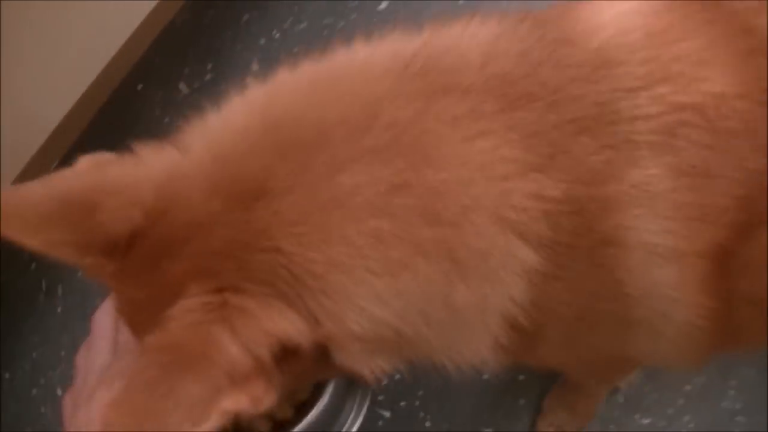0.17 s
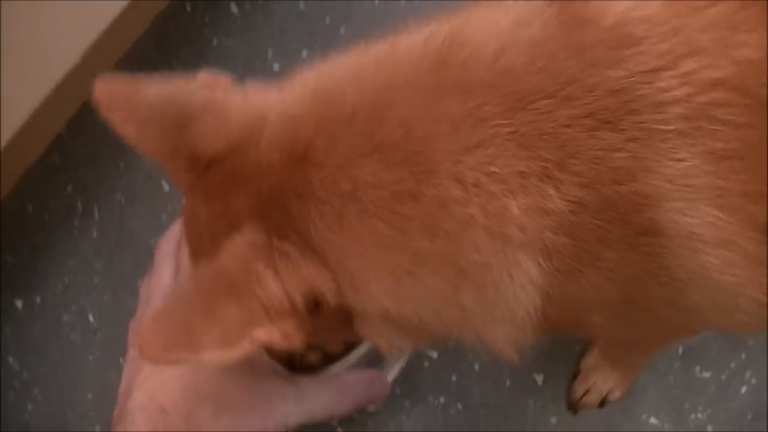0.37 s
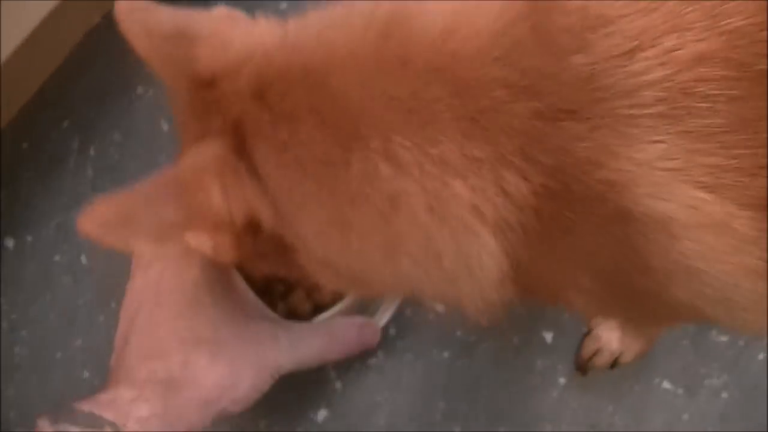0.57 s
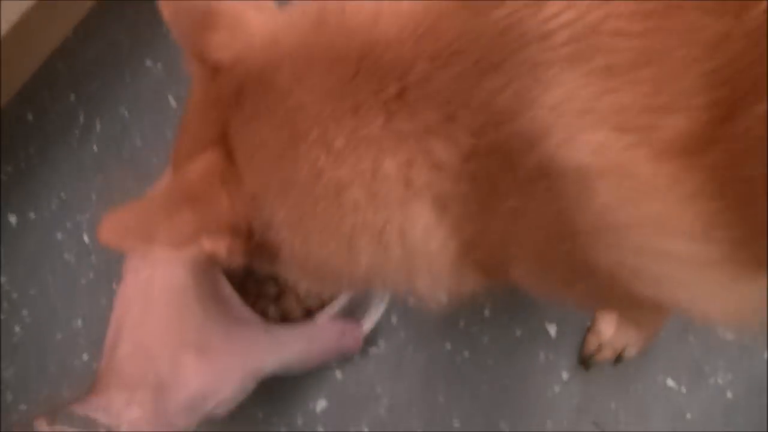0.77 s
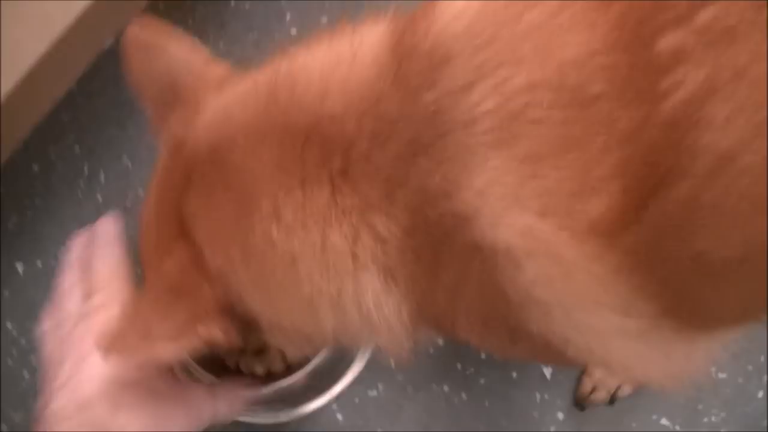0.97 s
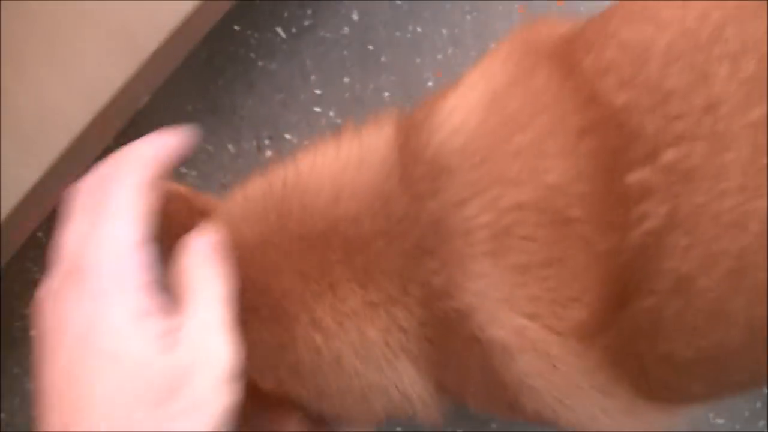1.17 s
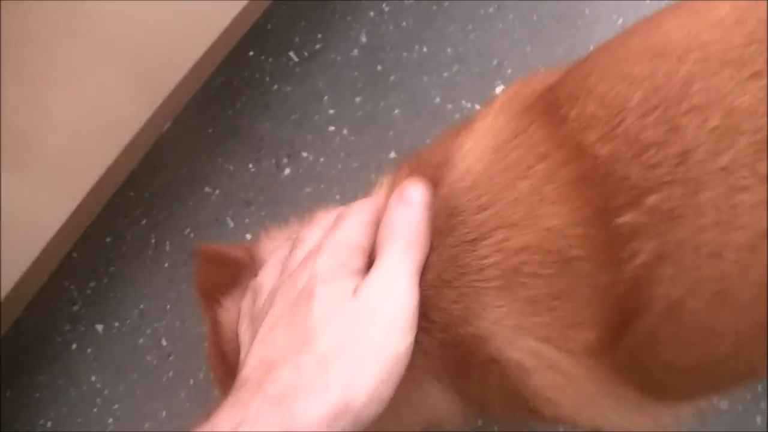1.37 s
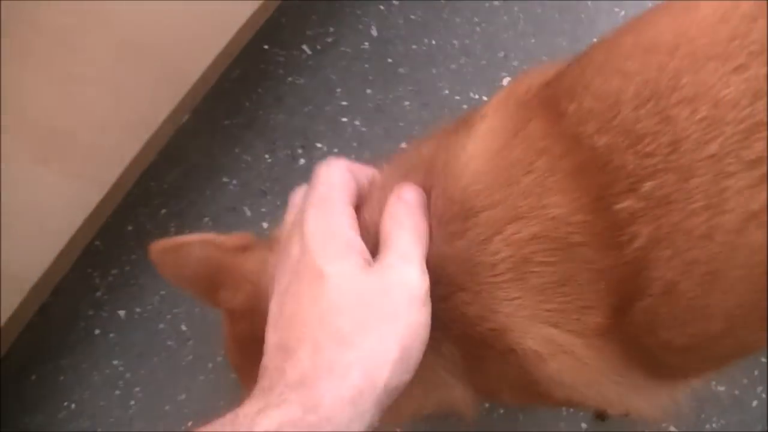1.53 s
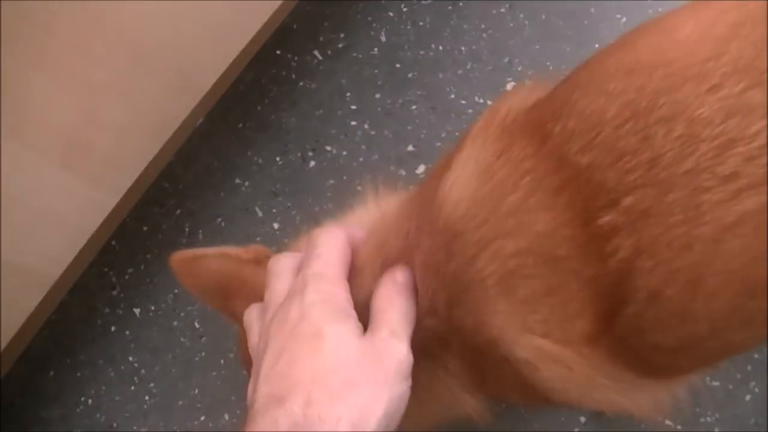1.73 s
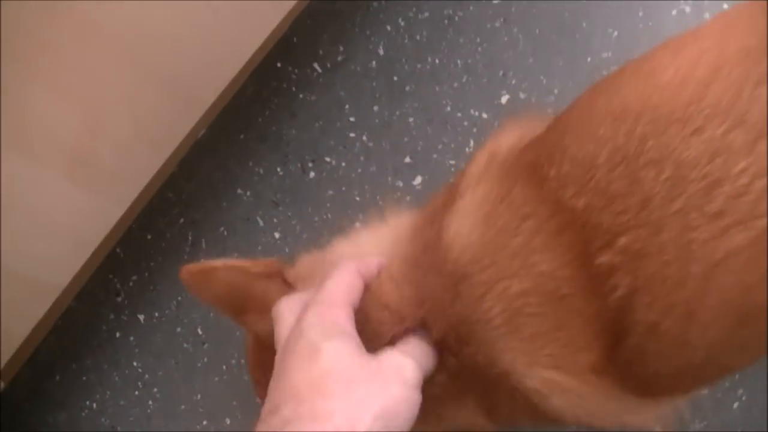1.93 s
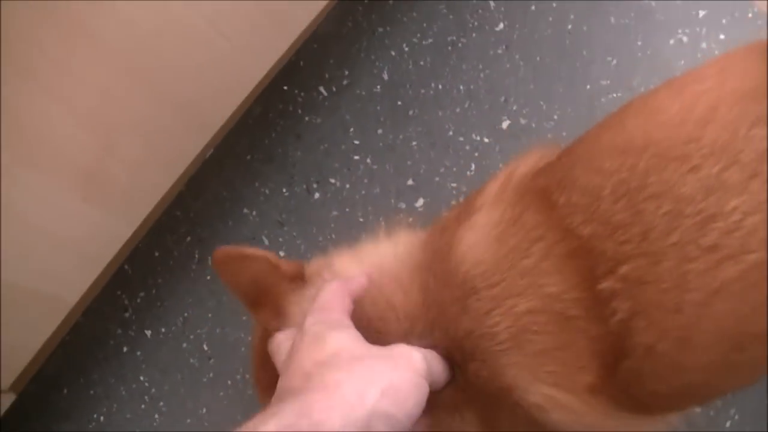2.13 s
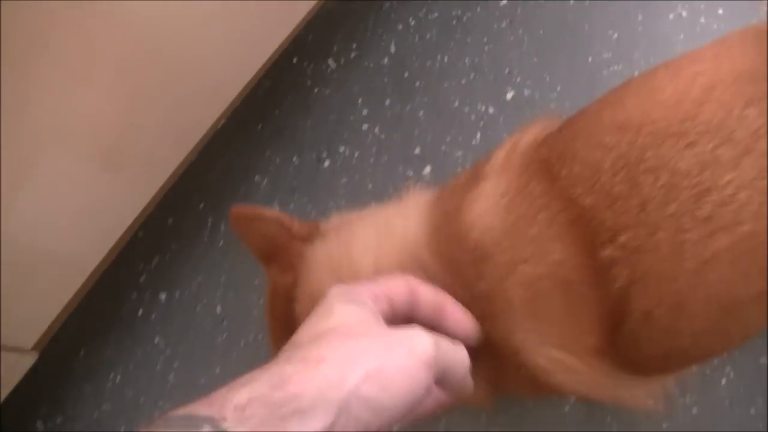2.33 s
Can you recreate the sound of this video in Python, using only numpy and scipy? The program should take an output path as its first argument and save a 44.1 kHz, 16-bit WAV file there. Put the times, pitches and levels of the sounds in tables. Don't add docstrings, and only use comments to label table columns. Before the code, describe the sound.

Dry kibble clatters in a steel bowl as a dog noses through it, close and crisp. From 0.1 to 0.8 s quick, bright rattles crowd together in the hand-held bowl. At about 0.82 and 0.87 s it lands with loud hard clunks, rocking dully near 0.94. After a brief lull, sharp clinks return around 1.3-1.4 and 1.65 s, then thin to light ticks by 2.4 s over faint kitchen hiss and low hum.

```python
import sys
import numpy as np
from scipy import signal
from scipy.fft import rfft, irfft, next_fast_len
from scipy.io import wavfile

SR = 44100
rng = np.random.default_rng(int(sys.argv[2]) if len(sys.argv) > 2 else 0)


def unload_audio(sound):
    columns = np.transpose(np.atleast_2d(sound))
    steps = np.round(np.clip(columns, -1, 1) * 32767)
    wavfile.write(sys.argv[1], SR, steps.astype(np.int16))


def field_ratio(decibels):
    return 10 ** (np.asarray(decibels, dtype=float) / 20)


N = 105840

# frequency_hz, level_db
AIR_SPECTRUM = [(24, -14), (40, -14.5), (245, -4.5), (316, -6.5), (485, -7.5), (823, -5), (10800, -19.5),
                (15300, -26.5), (16500, -28)]
# time_s, gain_db
HUM_WAVER = [(0, 13.5), (.9, -6), (1.8, 12)]
AIR_DB, HUM_HZ, HUM_DB = -53, 65, -75.5

# frequency_hz, bandwidth_hz, level_db
HELD_MODES = [(1110, 60, 2), (1420, 80, -2), (1700, 200, 0), (2080, 90, -2), (2910, 90, 0), (3480, 60, -6),
              (4210, 130, -7), (5210, 80, -7), (6670, 90, -14), (7990, 140, -14)]
# frequency_hz, bandwidth_hz, level_db
FLOOR_MODES = [(474, 55, -6), (655, 50, -6), (960, 60, -7), (1230, 70, 2), (1670, 90, -4), (2140, 55, -1),
               (2540, 50, -2), (2890, 120, -4), (3600, 70, -6), (4130, 110, -5), (5260, 140, -9),
               (6450, 120, -15), (8170, 250, -16)]
# frequency_hz, level_db
HELD_CRACK = [(240, -101), (400, -86), (609, -14), (1080, -1), (2840, 0.5), (5220, -12.5), (6290, -15),
              (15000, -24.5), (16500, -77)]
# frequency_hz, level_db
FLOOR_CRACK = [(88, -47), (150, -11), (469, 0), (830, -7), (934, -6.5), (2810, 3.5), (4600, -4.5),
               (15000, -25.5), (16500, -37)]
# frequency_hz, t60_s
CRACK_DECAY = [(500, 0.097), (3000, 0.11), (12000, 0.067)]
HELD_CUT_HZ, FLOOR_CUT_HZ = 680, 310
MODE_SPREAD_DB, MODE_SPLIT, MODE_RISE_S = 4.5, 0.01, 0.00022
CRACK_DB, TICK_DB, TICK_S = -3, 5.5, 0.0025
SOFT_DB, SPOT_BAND_DB = -0.23, 5

# start_s, length_s, level_db, tilt_db_per_octave
SHOVES = [(0.091, 0.14, -46, 1.5), (0.174, 0.13, -43, 2), (0.279, 0.12, -44.5, 1), (0.359, 0.11, -34, 1),
          (0.44, 0.17, -46.5, -0.5), (0.516, 0.4, -45.5, -0.5), (0.614, 0.083, -29.5, 2),
          (0.685, 0.19, -41.5, 0), (0.84, 0.032, -35.5, -3), (0.874, 0.065, -31, -3),
          (0.922, 0.11, -36.5, 4), (1.008, 0.23, -49, -3), (1.179, 0.06, -46, -2.8),
          (1.235, 0.15, -46, -1.9), (1.315, 0.094, -41.5, 4.5), (1.388, 0.11, -40.5, -2.4),
          (1.47, 0.26, -42.5, -1.3), (1.648, 0.1, -36.5, 0.4), (1.752, 0.13, -38, 1.6),
          (1.848, 0.099, -52.5, 5), (1.918, 0.073, -43, -0.8), (1.983, 0.13, -42, -1), (2.06, 0.17, -49, 0),
          (2.305, 0.11, -50.5, 0), (2.354, 0.33, -51, -3.5)]
# start_s, peak_db, contact_hz, tilt_db_per_octave
HELD_KNOCKS = [(0.114, -23.5, 1900, -0.61), (0.143, -23, 1920, -0.47), (0.19, -30.5, 1820, 5),
               (0.22, -20, 2020, 3), (0.2831, -16, 2080, 0), (0.306, -22.5, 2020, -2),
               (0.399, -23, 1620, -5), (0.411, -19, 1520, 4), (0.497, -24.5, 1920, 1),
               (0.514, -22, 1140, -1.1), (0.54, -15.5, 2140, -1), (0.55, -22, 1900, -0.5),
               (0.561, -28, 2800, 1), (0.585, -24, 2100, 1), (0.622, -13, 2340, 0.5),
               (0.647, -14.5, 1170, 5), (0.684, -19, 1420, 2), (0.701, -21.5, 1320, 1),
               (0.78, -16.5, 1300, -1), (0.8, -22, 1130, -2.5)]
# start_s, peak_db, contact_hz, tilt_db_per_octave, clatter_s
FLOOR_KNOCKS = [(0.8243, -11.5, 796, -3.5, 0.017), (0.8725, -8, 740, -7, 0.0031),
                (0.938, -27, 420, 0.5, 0.016), (0.955, -23, 630, -5, 0.022), (1.187, -27, 1590, 0, 0.012),
                (1.27, -25.5, 1290, -1, 0.0091), (1.325, -12, 1090, 1.9, 0.018),
                (1.395, -14.5, 1810, -2, 0.0059), (1.433, -20, 2600, 6, 0.0094),
                (1.578, -26.5, 1240, 0.5, 0.0047), (1.643, -20.5, 1400, 2.2, 0.025),
                (1.806, -23.5, 1240, -3, 0.0068), (1.9235, -20, 2820, 0, 0.015),
                (1.9975, -30.5, 2400, -7, 0.0037), (2.072, -22.5, 1350, -1, 0.027),
                (2.107, -21.5, 1370, 1.5, 0.012), (2.158, -28.5, 3580, -0.5, 0.011),
                (2.288, -32.5, 2130, -3, 0.0083), (2.311, -22, 1000, 1.2, 0.0097),
                (2.375, -27.5, 2900, 5, 0.0062)]
# start_s, peak_db, contact_hz, tilt_db_per_octave, clatter_s
SNAPS = [
    (.339, -21.5, 8100, 8, 0.0092),
    (.7225, -24, 8000, 10, 0.02),
    (.8243, -9, 5830, 16, 0.0093),
    (.838, -14, 5370, 22, 0.0093),
    (.8735, -16, 7100, 15, 0.022),
    (1.1553, -16.5, 3840, 6.5, 0.00034),
    (.935, -18, 322, -2.5, 0.032),
]
# start_s, peak_db, contact_hz, tilt_db_per_octave
TICKS = [(0.098, -38, 1880, 5), (0.208, -22, 2600, -4.5), (0.375, -34, 1700, -2), (0.386, -27, 1630, 0),
         (0.61, -20, 1670, -2), (.632, -17.5, 2930, -2), (.66, -45, 1700, -7), (.72, -21.5, 1780, 1),
         (0.731, -35, 3500, -1), (.751, -26, 4340, 2), (.889, -16, 3100, 6.5), (1.244, -36, 1530, 4),
         (1.265, -31, 1230, -11), (1.289, -26, 5070, 5.5), (1.296, -21.5, 2860, -2), (1.304, -25, 2000, -1),
         (1.344, -35, 2930, 0), (1.403, -22, 1740, -4.5), (1.413, -30, 1890, -11), (1.422, -31, 1660, -6),
         (1.441, -23.5, 2190, 2), (1.506, -31.5, 1700, -1), (1.661, -23, 1200, 0), (1.672, -23, 2320, -3),
         (1.682, -17.5, 2920, -0.5), (1.694, -23, 2730, 0), (1.707, -24, 2910, 3), (1.767, -26, 1200, -1.5),
         (1.779, -27.5, 4070, -5.5), (1.789, -26, 3900, 0.5), (1.824, -25.5, 1190, -5.5),
         (1.843, -26, 1630, -4.5), (1.864, -38, 3530, -3), (2.016, -26.5, 1250, 1), (2.038, -29.5, 2570, 5),
         (2.047, -26.5, 1180, 1.5), (2.054, -28, 2800, -6), (2.123, -34.5, 1360, -1),
         (2.135, -34, 4100, -7), (2.184, -40.5, 1260, -2), (2.359, -29.5, 4230, -1.5),
         (2.393, -23, 3900, -1)]
SET_DOWN_S, SHOVE_LEAN = 0.81, 0.54
HELD_CLATTER_S, TICK_CLATTER_S, SWELL_S = 0.007, 0.0068, 0.0006
DAMP = 14.7
CLICKS_PER_S, CLICK_SPREAD_DB, RAREST = 1000, 1, 0.12
BLOW_DB, CONTACT_DB, CONTACT_OCTAVES = 10.5, 7.5, 0.45

# frequency_hz, level_db
SIDE_SPECTRUM = [(300, -4.5), (1000, -34), (2500, -18.5), (5000, -3.5), (12000, 2)]
LEAD_SAMPLES = 0.33
# frequency_hz, t60_s
ROOM_DECAY = [(200, 0.25), (1500, 0.19), (6000, 0.36), (15000, 0.36)]
ROOM_DB = -9.5

# start_s, frequency_hz, level_db, t60_s
RIM_RINGS = [
    (.8243, 900, -13.5, 0.031),
    (0.827, 5300, -25, 0.032),
    (0.828, 10600, -20, 0.042),
    (0.836, 5380, -25, 0.084),
    (.873, 786, -26, 0.049),
    (.876, 6200, -32, 0.19),
    (0.938, 398, -23, 0.091),
    (.946, 471, -22.5, 0.055),
    (.954, 640, -22, 0.058),
    (0.964, 4080, -34.5, 0.14),
]
RIM_RISE_S, EDGE_HZ = 0.00057, 16100


def evened(x):
    return x / np.sqrt(np.mean(x ** 2) + 1e-20)


def read(points, hz):
    f, value = np.transpose(points)
    return np.interp(np.log(hz + 1), np.log(f + 1), value)


def add(mix, start_s, sound):
    part = mix[round(start_s * SR):][:len(sound)]
    part += sound[:len(part)]


def coloured(x, db_of):
    length = x.shape[-1]
    size = next_fast_len(length + 2048) * 2
    cepstrum = irfft(db_of(np.fft.rfftfreq(size, 1 / SR)) * np.log(10) / 20, size)
    cepstrum[1:size // 2] *= 2
    response = np.exp(rfft(cepstrum[:size // 2], size))
    return irfft(rfft(x, size) * response, size)[..., :length]


def fading(x, decay):
    hz, t, z = signal.stft(x, SR, nperseg=64)
    z = z * field_ratio(-60 * t / read(decay, hz)[:, None])
    return signal.istft(z, SR, nperseg=64)[1][..., :x.shape[-1]]


def kitchen():
    shared, left, right = rng.standard_normal((3, N))
    noise = np.array([shared + 0.6 * left, shared + 0.6 * right])
    air = evened(coloured(noise, lambda f: read(AIR_SPECTRUM, f)))
    t = np.arange(N) / SR
    hum_level = field_ratio(HUM_DB + np.interp(t, *np.transpose(HUM_WAVER)))
    return field_ratio(AIR_DB) * air + hum_level * np.sin(2 * np.pi * HUM_HZ * t)


def bowl(modes, crack, cut_hz, count=8):
    hz, width, db = np.transpose(modes)[:, :, None, None]
    t = np.arange(4000) / SR
    strength, detune, phase = rng.standard_normal((3, len(modes), 2 * count, 1))
    decay = field_ratio(db + MODE_SPREAD_DB * strength) * width * np.exp(-np.pi * width * t)
    tones = np.sin(2 * np.pi * hz * (1 + MODE_SPLIT * detune) * t + 3 * phase)
    ring = (decay * tones).sum(0) * (1 - np.exp(-t / MODE_RISE_S))
    ring = ring[:count] + ring[count:]

    crack_noise, tick_noise = rng.standard_normal((2, count, len(t)))
    tick = field_ratio(TICK_DB) * tick_noise * np.exp(-t / TICK_S)
    snap = coloured(fading(crack_noise, CRACK_DECAY) + tick, lambda f: read(crack, f))
    spots = evened(ring) + field_ratio(CRACK_DB) * evened(snap)

    band_hz = rng.permutation(np.geomspace(1000, 6000, count))

    def spot_gain_db(f, k):
        softness = k * SOFT_DB * np.log2(1 + f / 3000)
        own_band = SPOT_BAND_DB * np.exp(-np.log2((f + 1) / band_hz[k]) ** 2 * 4)
        low_cut = 10 * np.log10(1 + (cut_hz / (f + 20)) ** 6)
        return softness + own_band - low_cut

    return np.array([coloured(s, lambda f: spot_gain_db(f, k)) for k, s in enumerate(spots)])


def pellets(spots, luck, shape, tilt_db, contact_hz=None):
    when, size, spot = luck[:, :len(shape)]
    force = np.minimum(1, size + RAREST) ** (-CLICK_SPREAD_DB * np.log(10) / 20)
    clicks = (when < CLICKS_PER_S / SR) * force * shape
    where = ((size + spot) / 2 * len(spots)).astype(int)
    if contact_hz:
        clicks = np.minimum(clicks, shape * 2)
        clicks[0] = field_ratio(BLOW_DB)
        where[0] = where[0] % 4
    trains = clicks * (where == np.arange(len(spots))[:, None])
    sound = signal.fftconvolve(trains, spots, axes=1).sum(0)

    def gain_db(f):
        tilt = tilt_db * np.log2((f + 200) / 2000)
        if not contact_hz:
            return tilt
        octaves = np.log2((f + 1) / contact_hz)
        return tilt + CONTACT_DB * np.exp(-(octaves / CONTACT_OCTAVES) ** 2)

    return coloured(sound, gain_db)


def shoves(held, down):
    out, t = np.zeros(N), np.arange(9000) / SR
    for start_s, length_s, db, tilt_db in SHOVES:
        arch = np.sin(np.pi * np.clip(t / length_s, 0, 1) ** SHOVE_LEAN)
        spots = held if start_s < SET_DOWN_S else down
        sound = pellets(spots, rng.random((3, len(t))), arch, tilt_db)
        add(out, start_s, field_ratio(db) * evened(sound) * np.sqrt(length_s * SR / len(sound)))
    return out


def knocks(held, down):
    out, t = np.zeros(N), np.arange(2500) / SR
    rows = [(*row, HELD_CLATTER_S) for row in HELD_KNOCKS] + list(FLOOR_KNOCKS) + list(SNAPS)
    rows += [(*row, TICK_CLATTER_S) for row in TICKS]
    for start_s, db, contact_hz, tilt_db, clatter_s in rows:
        clatter_s = max(clatter_s, 1e-4)
        spots = held if start_s < SET_DOWN_S else down
        sound = pellets(spots, rng.random((3, len(t))), np.exp(-t / clatter_s), tilt_db, contact_hz)
        age = np.arange(len(sound)) / SR
        sound = sound * np.exp(-age / (DAMP * clatter_s))
        sound = sound * np.minimum(1, age / min(SWELL_S, clatter_s))
        add(out, start_s, field_ratio(db) * sound / abs(sound).max())
    return out


def kibble():
    held = bowl(HELD_MODES, HELD_CRACK, HELD_CUT_HZ)
    down = bowl(FLOOR_MODES, FLOOR_CRACK, FLOOR_CUT_HZ)
    return shoves(held, down) + knocks(held, down)


def scatter(x, count=14):
    turn = np.arange(N) / SR * np.pi * 3
    windows = np.cos(turn + np.pi * np.arange(count)[:, None] / count) ** 40
    taps = rng.standard_normal((count, 300)) * np.exp(-np.arange(300) / 50)
    return evened(signal.fftconvolve(x * windows, taps, axes=1).sum(0)[:N]) * np.std(x)


def room(x):
    taps = np.zeros((2, SR // 2))
    slots = np.arange(200, SR // 2 - 20, 20)
    at = slots + rng.integers(0, 20, (2, len(slots)))
    np.put_along_axis(taps, at, rng.choice([-1., 1.], at.shape), 1)
    tail = fading(taps, ROOM_DECAY)
    return signal.fftconvolve(x[None], tail / np.linalg.norm(tail[0]), axes=1)[:, :N]


def rim():
    out, t = np.zeros(N), np.arange(6000) / SR
    for start_s, hz, db, t60_s in RIM_RINGS:
        split, turn = rng.random(2)
        partner_hz = hz * (1 + MODE_SPLIT * (0.5 + split))
        pair = np.sin(2 * np.pi * hz * t) + 0.5 * np.sin(2 * np.pi * (partner_hz * t + turn))
        add(out, start_s, field_ratio(db - 60 * t / t60_s) * (1 - np.exp(-t / RIM_RISE_S)) * pair)
    return out


def scene():
    air = kitchen()
    near = kibble()
    side = coloured(scatter(near), lambda f: read(SIDE_SPECTRUM, f))
    side = side + LEAD_SAMPLES / 2 * np.gradient(near)
    near = near + rim()
    return near + np.array([side, -side]) + field_ratio(ROOM_DB) * room(near) + air


def band_limit(x):
    return signal.sosfilt(signal.butter(12, 16670, fs=SR, output="sos"), x)


def record(dry):
    edge = signal.firwin(301, EDGE_HZ, window=("kaiser", 8), fs=SR)
    mix = signal.oaconvolve(dry, edge[None], "same")
    return band_limit(mix)


dry = scene()
out = record(dry)
unload_audio(out)
```